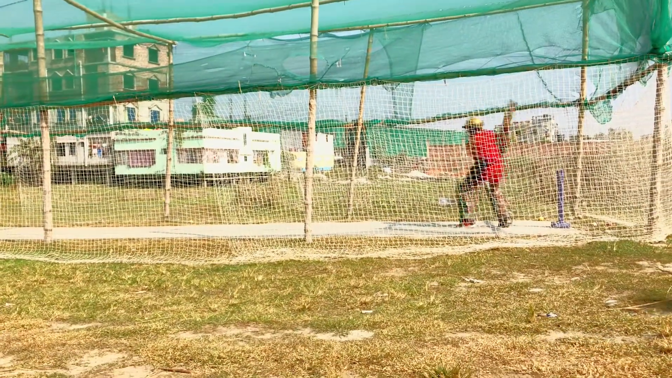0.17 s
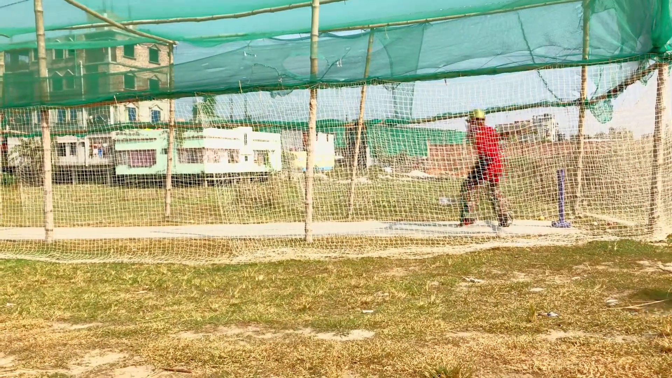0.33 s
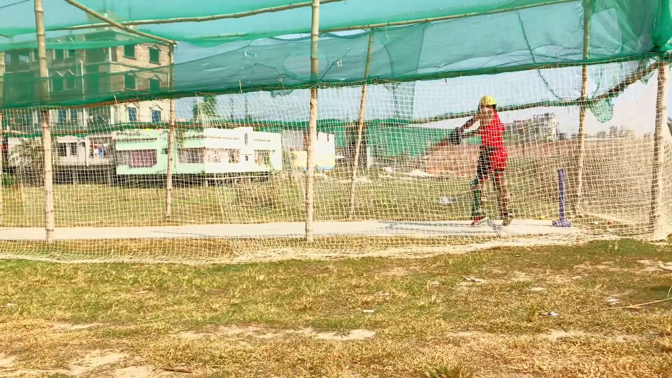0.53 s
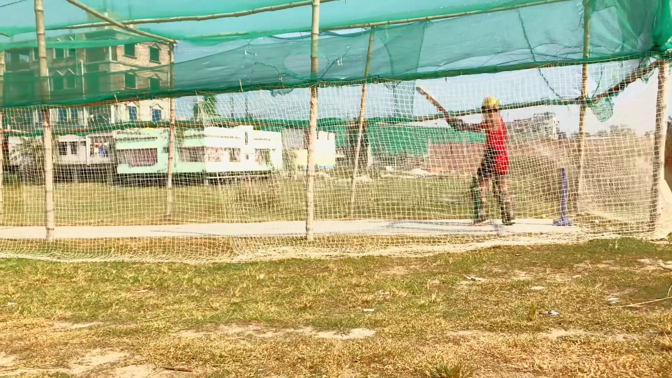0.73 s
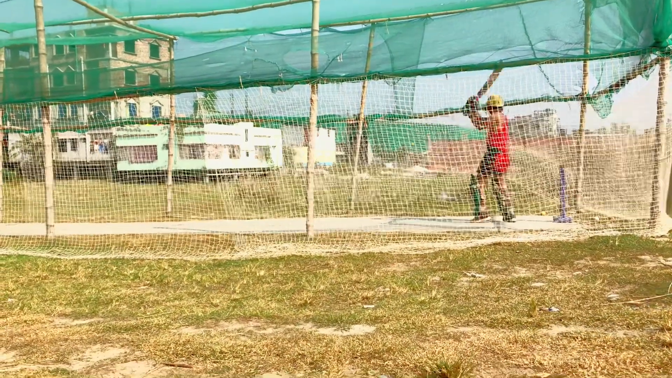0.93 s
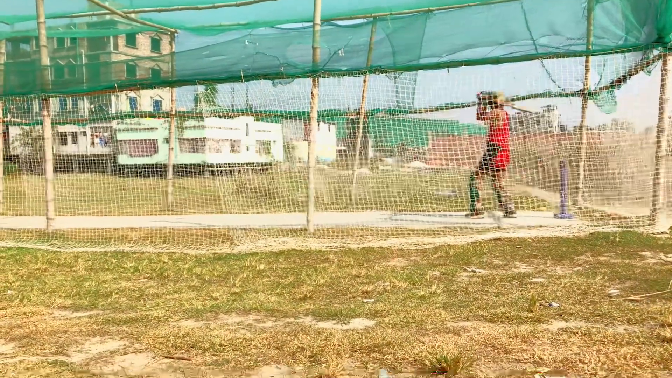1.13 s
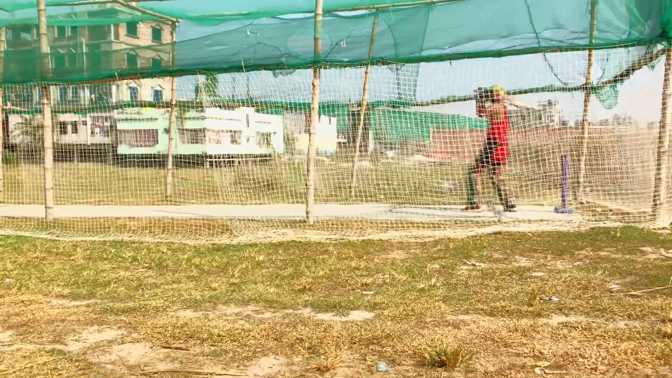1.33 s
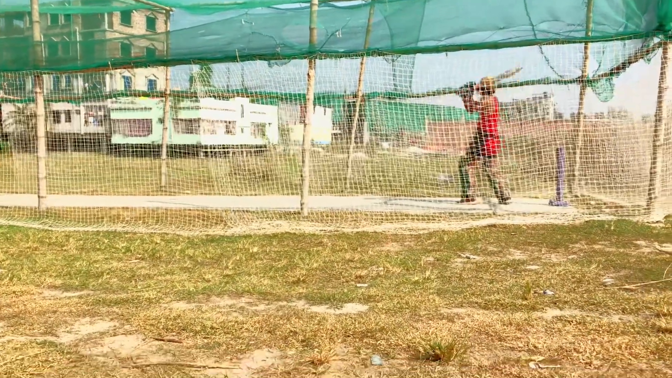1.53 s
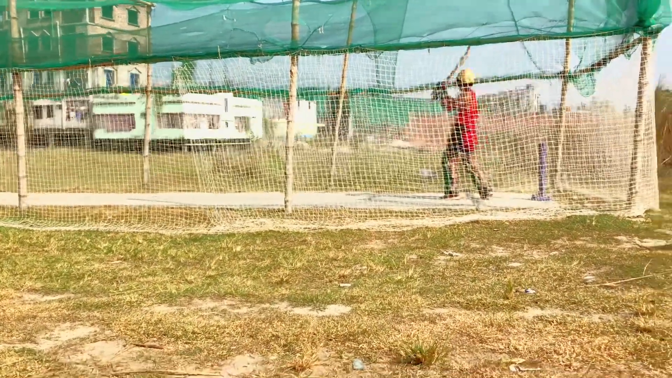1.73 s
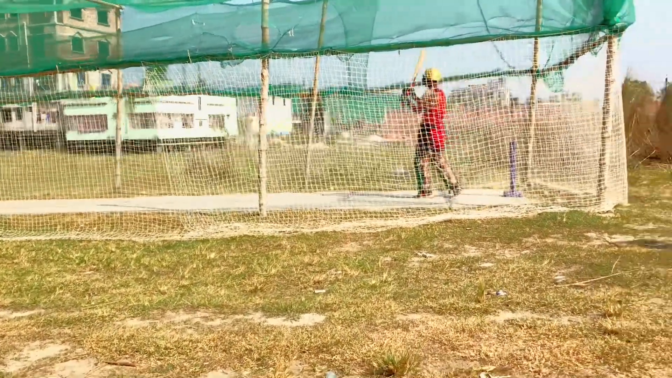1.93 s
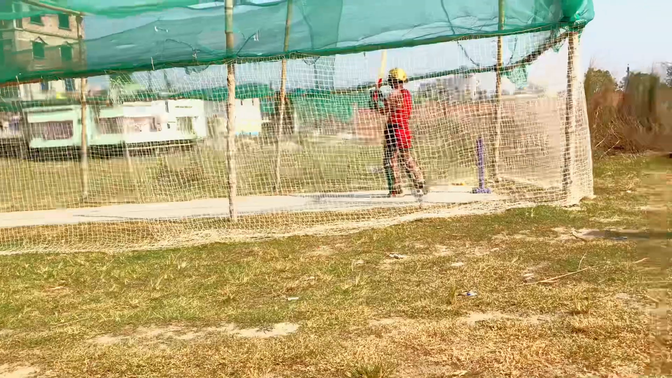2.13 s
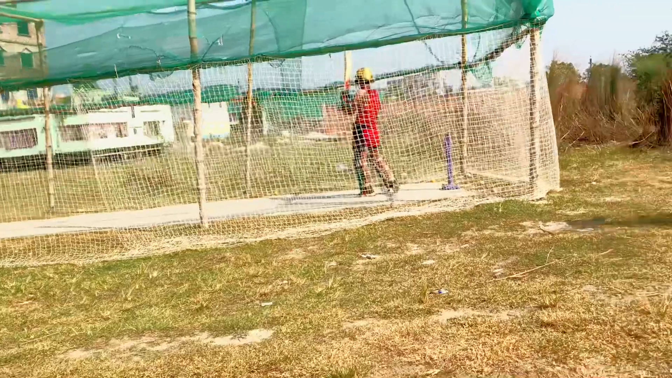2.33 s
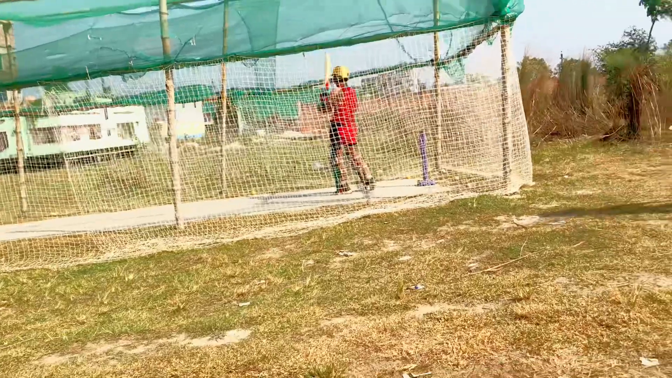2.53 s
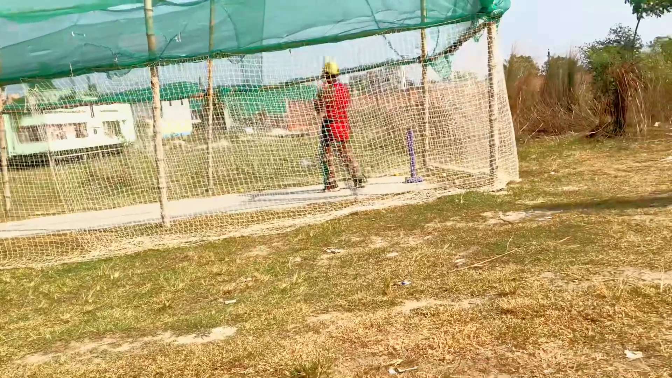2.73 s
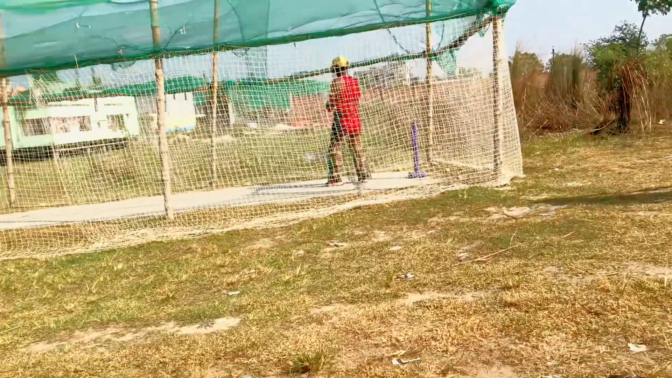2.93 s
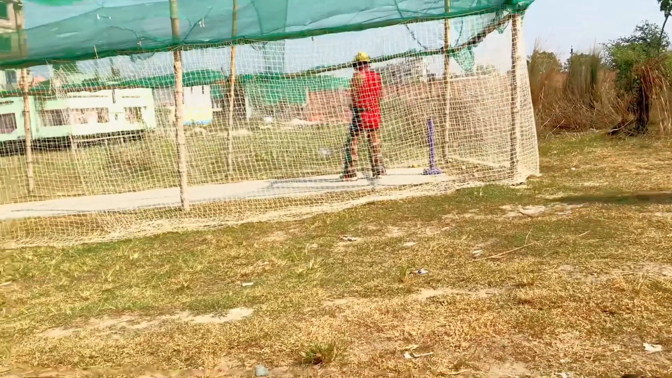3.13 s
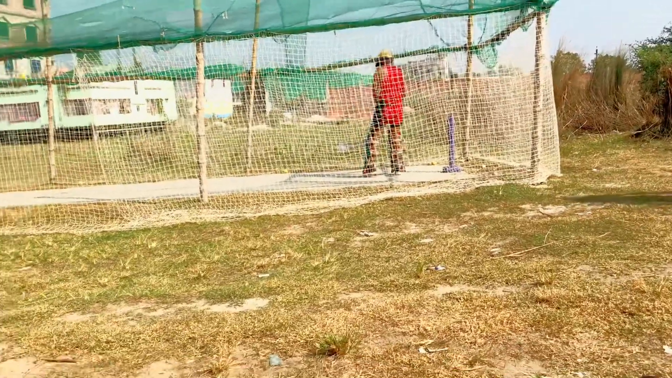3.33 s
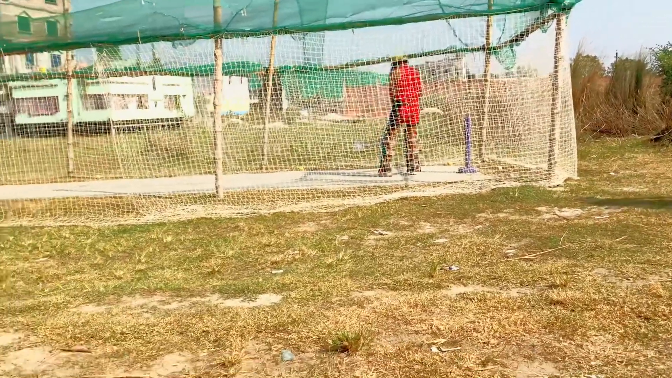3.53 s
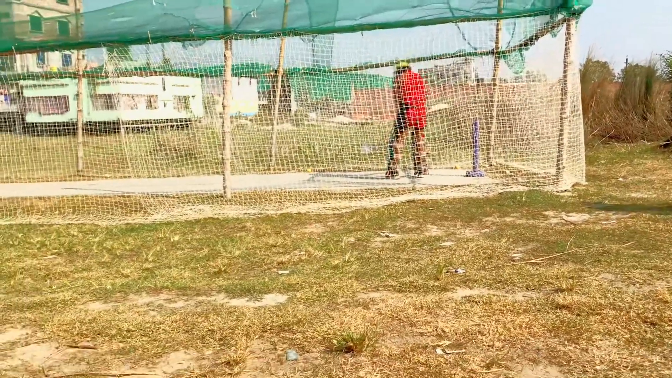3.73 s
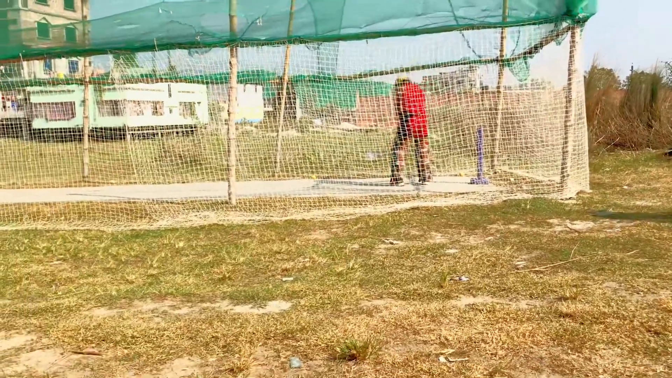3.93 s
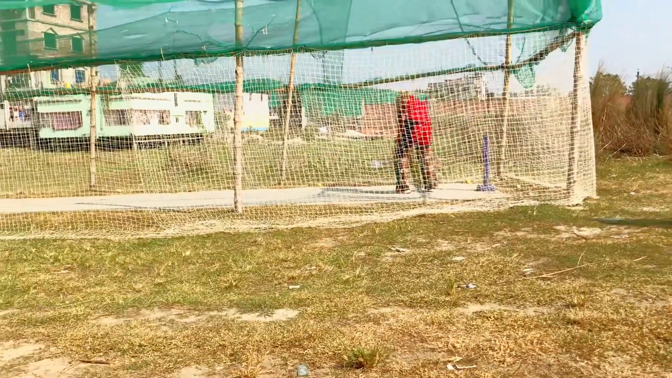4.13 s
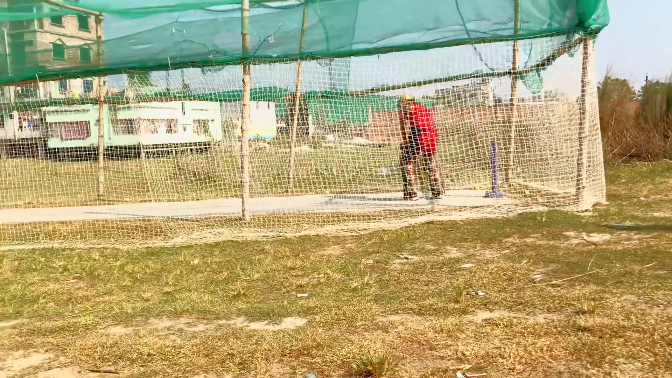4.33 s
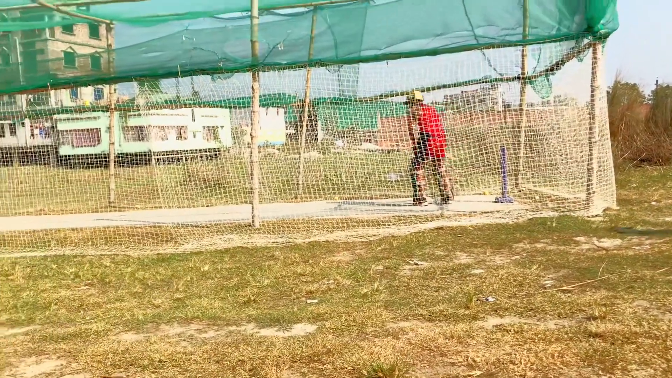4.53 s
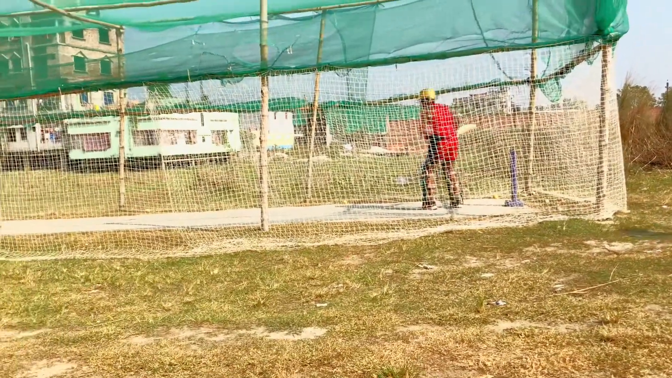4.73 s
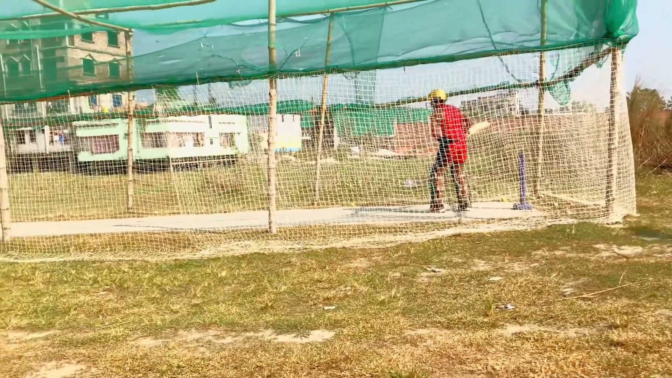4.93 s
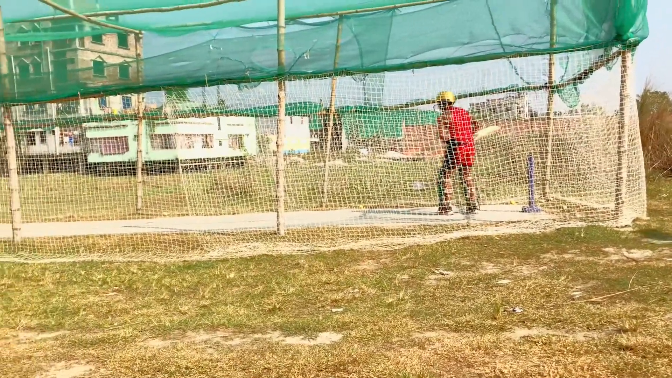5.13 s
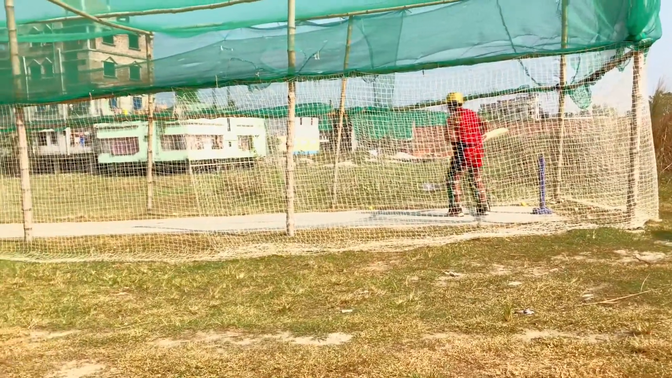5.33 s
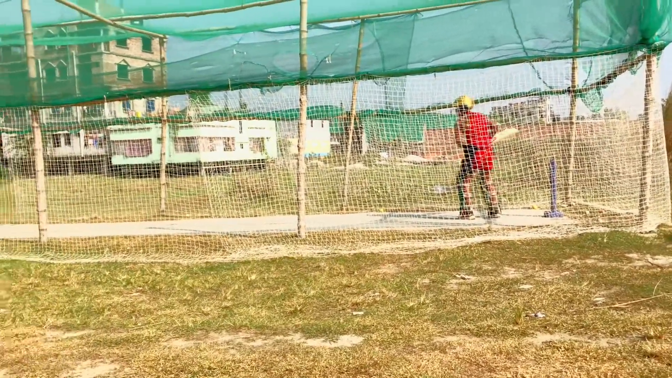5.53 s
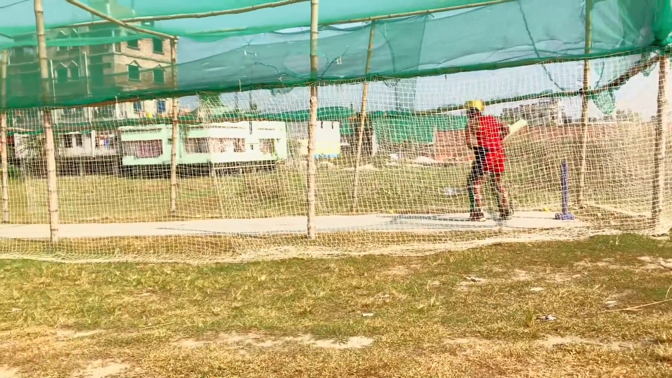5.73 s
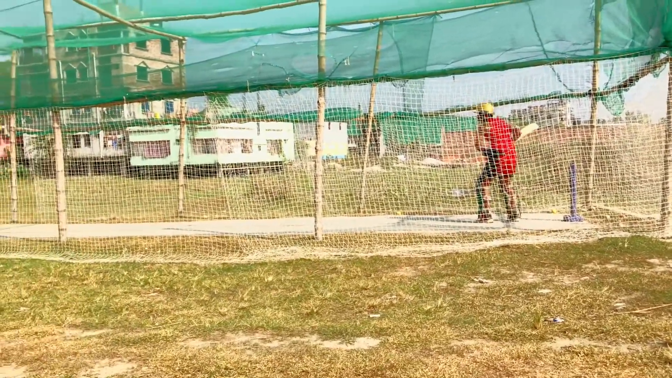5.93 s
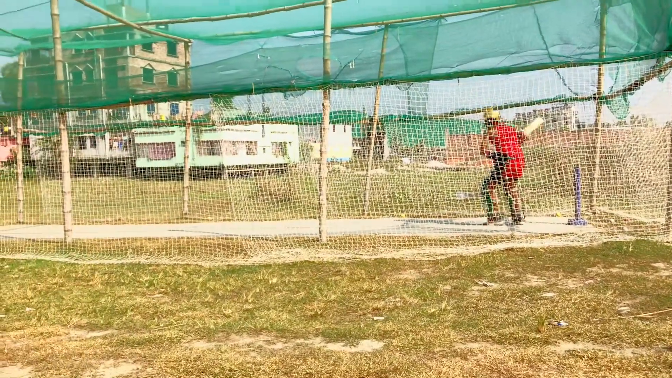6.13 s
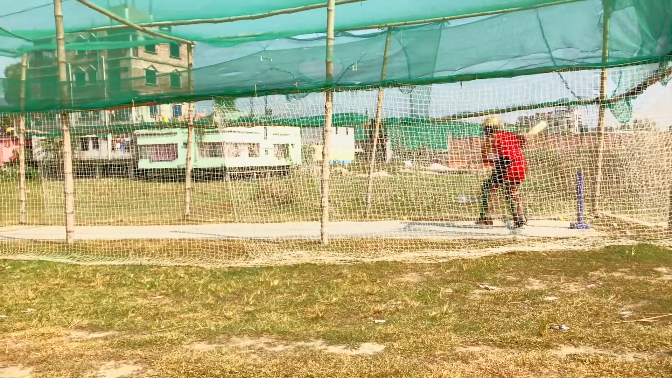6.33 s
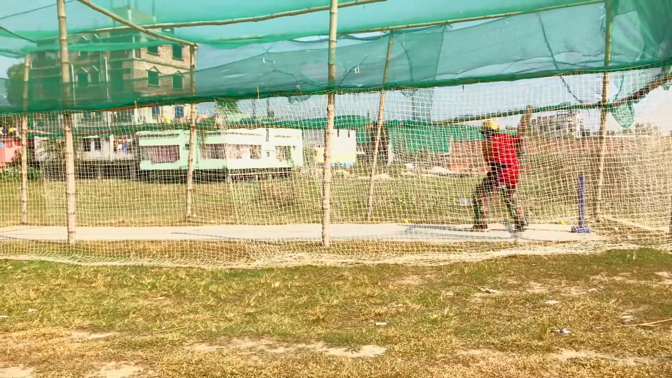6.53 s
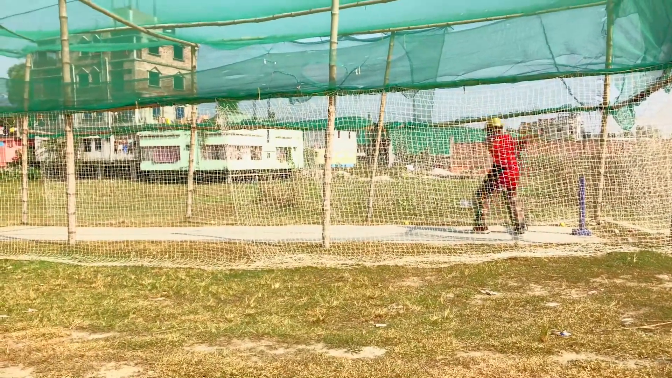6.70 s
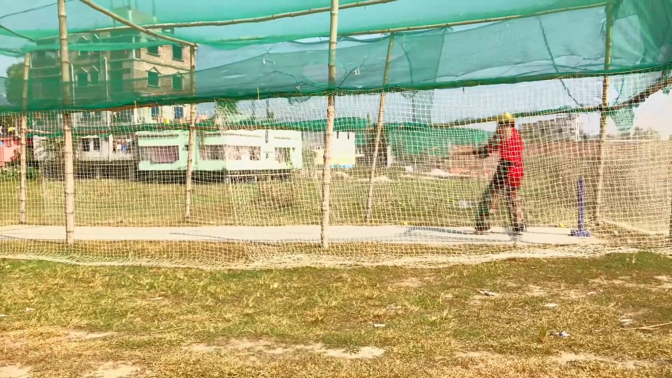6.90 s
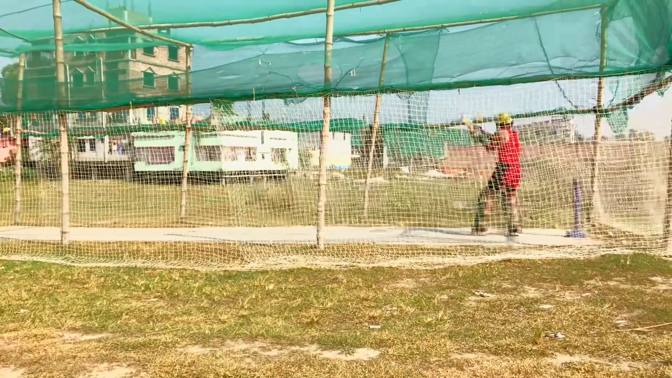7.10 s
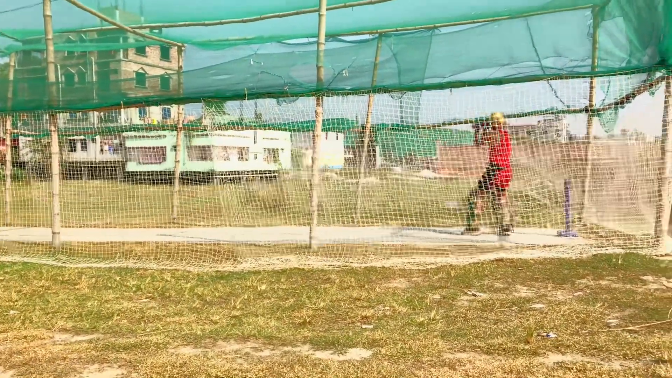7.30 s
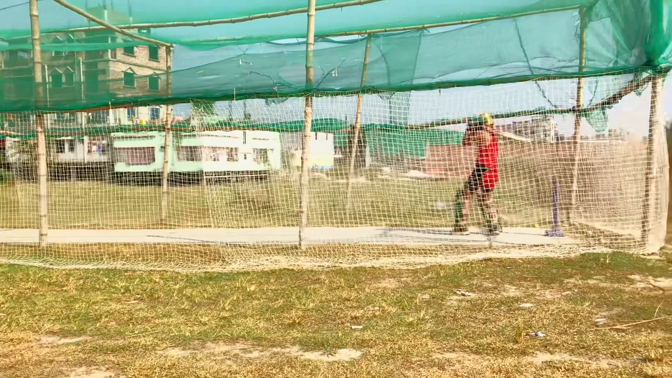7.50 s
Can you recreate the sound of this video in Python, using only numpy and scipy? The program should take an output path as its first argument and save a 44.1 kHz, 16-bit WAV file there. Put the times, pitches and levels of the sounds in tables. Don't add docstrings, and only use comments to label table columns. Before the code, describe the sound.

In an open-air cricket net, light grit taps lead to a brief starter grind and a violent bat crack. A single-cylinder engine catches close by, thumping low and revving in uneven bursts. Shoes squeak, balls bounce and something knocks hollowly; a loud bounce comes midway, then a brighter bat crack near the end. The small camera microphone hisses and overloads on the blows.

```python
import sys
import numpy as np
from scipy import signal
from scipy.io import wavfile
from scipy.ndimage import uniform_filter1d

SR = 44100
rng = np.random.default_rng(int(sys.argv[2]) if len(sys.argv) > 2 else 0)


def dump(signal):
    limited = np.clip(np.atleast_2d(signal).T, -1, 1)
    pcm = np.round(limited * 32767).astype(np.int16)
    wavfile.write(sys.argv[1], SR, pcm)


def gain_from_db(level_db):
    decades = np.asarray(level_db, float) / 20
    return 10 ** decades


N = 337790

# start_s, stop_s, rasp_db, bark_db, extra_rumble_db
THROTTLE = [
    (0.65, 0.92, -35.5, -32.5, 17.2),
    (2.107, 2.418, -39, -36, 4),
    (2.713, 2.946, -45.5, -54, 6),
    (3.777, 4.84, -40, -37.5, 1),
    (5.998, 6.823, -40, -42.5, 7.5),
    (7.108, 7.335, -52, -51, -0.8),
]


def rms_one(x):
    return x / np.sqrt(np.mean(x ** 2) + 1e-20)


def in_time(rows):
    s, *columns = np.transpose(rows)
    return [np.interp(np.arange(N) / SR, s, c) for c in columns]


def drift(rate):
    knots = rng.standard_normal(int(N / SR * 60) + 2)
    return np.interp(np.arange(N) / SR * min(rate, 59), np.arange(len(knots)), knots)


def resonate(x, hz, width_hz):
    r = np.exp(-np.pi * width_hz / SR)
    feedback = [1, -2 * r * np.cos(2 * np.pi * hz / SR), r * r]
    return signal.lfilter([(1 - r * r) / 2, 0, (r * r - 1) / 2], feedback, x)


def formants(x, table):
    total = 0
    for k, (hz, width_hz, db) in enumerate(table):
        total = total + (-1) ** k * gain_from_db(db) * resonate(x, hz, width_hz)
    return rms_one(total)


def band(x, low_hz, high_hz):
    return signal.sosfilt(signal.butter(2, [low_hz, min(high_hz, .45 * SR)], "band", fs=SR, output="sos"), x)


def top_cut(x, hz):
    return signal.sosfilt(signal.cheby2(14, 80, hz, fs=SR, output="sos"), x)


def add(out, s, sound):
    i = round(s * SR)
    out[i:i + len(sound)] += sound[:N - i]


def held(start, stop, db, rise_db_s, fall_db_s, swell_db_s=0):
    t = np.arange(N) / SR
    rise = rise_db_s * np.maximum(start - t, 0)
    swell = swell_db_s * np.clip(t - start, 0, stop - start)
    fall = fall_db_s * np.maximum(t - stop, 0)
    return gain_from_db(db - rise + swell - fall)


def air():
    # centre_hz, level_db per Hz
    air_spectrum = [(130, -3.5), (410, -22.5), (994, -25), (2600, -32), (4780, -37), (6870, -39.5),
                    (10500, -40), (14500, -45)]
    hz, db = np.transpose(air_spectrum)
    white = rng.standard_normal((2, N))
    edges = 155 * 2 ** np.arange(0, 7.1, .5)
    out = 0
    for k, (low, high) in enumerate(zip(edges, edges[1:])):
        level_db = np.interp(np.log(low * high) / 2, np.log(hz), db)
        out = out + gain_from_db(level_db + drift(11.0)) * band(white[k % 2], low, high)
    return gain_from_db(-43) * rms_one(out)


def whine():
    # multiple, level_db rms
    clock_lines = [(5, -76), (6, -71), (7, -70), (8, -70), (9, -70), (10, -72), (11, -73), (12, -76),
                   (13, -78), (14, -78), (15, -80)]
    clock_hz, t, out = 999.87, np.arange(N) / SR, 0
    for k, db in clock_lines:
        out = out + np.sqrt(2) * gain_from_db(db) * np.sin(2 * np.pi * (k * clock_hz * t + rng.random()))
    return out


def blow(modes, crack_db, crack_hz, tick_db, thud_db, thud_hz):
    t = np.arange(round(.06 * SR)) / SR
    contact = 1 - np.exp(-t / .0003)
    crack = sum(gain_from_db(db - 60 * t / t60) * np.sin(2 * np.pi * crack_hz * ratio * t) for ratio, db, t60 in modes)
    snap = band(rng.standard_normal(len(t)) * gain_from_db(-60 * t / .012), .55 * crack_hz, 2.5 * crack_hz)
    tick = band(rng.standard_normal(len(t)) * gain_from_db(-60 * t / .006), 4000, 16000)
    swell = thud_hz * t / .68
    thud = -swell ** 3 * np.exp(3 - 3 * swell) * np.sin(2 * np.pi * thud_hz * t)
    sharp = gain_from_db(crack_db) * contact * (crack + gain_from_db(-1.0) * snap) + gain_from_db(tick_db) * tick
    return sharp, gain_from_db(thud_db) * thud


def small_impacts():
    # ratio, level_db, t60_s
    contact_modes = [(1, 0, .006), (1.45, -4, .005), (1.9, -7, .004), (.55, -5, .006)]
    # start_s, crack_db, crack_hz, tick_db
    taps = [
        (.048, -31, 4040, -39),
        (.092, -29, 3500, -34),
        (.108, -30, 3320, -40),
            (5.405, -58, 4000, -43),
        (5.465, -58, 4000, -44),
    ]
    # start_s, crack_db, crack_hz, thud_db, thud_hz
    knocks = [
        (.0695, -28, 800, -46, 503),
        (.1147, -22.5, 2850, -24, 625),
        (1.312, -33, 900, -28, 300),
        (1.4738, -24.5, 1040, -46, 400),
        (1.489, -30, 1300, -29, 395),
        (1.496, -22.5, 850, -44, 420),
        (4.188, -10.5, 1320, -9.5, 360),
        (6.5402, -21.5, 6200, -23, 307),
    ]
    out = np.zeros(N)
    for s, *strength in taps:
        add(out, s, blow(contact_modes, *strength, 0, strength[1])[0])
    for s, db, hz, thud_db, thud_hz in knocks:
        tick_db = db + min(19 * np.log2(hz / 2690), -8)
        add(out, s, sum(blow(contact_modes, db, hz, tick_db, thud_db, thud_hz)))
    return out


def silencer(x):
    # centre_hz, width_hz
    chambers = [(91, 36), (63, 32)]
    for hz, width_hz in chambers:
        x = resonate(x, hz, width_hz)
    return band(x, 37, 138)


def loose_burns(running, per_s):
    # level_db, rise_db_s, fall_db_s
    cranked = (-36, 130, 540)
    lit_db = -25 - .65 * (per_s - 10)
    for start, stop, _, _, rumble_db in THROTTLE:
        lit_db = lit_db + rumble_db * held(start, stop, 0, 60, 67)
    unlit = held(.07, .2, *cranked) + gain_from_db(-36)
    gain = np.where(running, gain_from_db(lit_db), unlit)
    return uniform_filter1d(gain, size=2000) * rms_one(silencer(rng.standard_normal(N)))


def starter():
    # centre_hz, width_hz, level_db
    gear_rings = [(1050, 110, 0), (1500, 300, -3), (2150, 170, -7), (3150, 130, -2), (3980, 110, -9),
                  (5670, 120, -15)]
    # start_s, stop_s, level_db
    grinds = [
        (.295, 0.359, -43),
        (0.439, 0.458, -28),
    ]
    # time_s, pitch_hz, level_db
    swish = [(.415, 3250, -58), (.428, 3180, -43), (.44, 3020, -42), (.452, 2800, -50)]
    pushes = sum(held(*row, rise_db_s=420, fall_db_s=1200) for row in grinds)
    grind = pushes * gain_from_db(-1.5 + 2.5 * drift(45)) * formants(rng.standard_normal(N), gear_rings)
    t = np.arange(N) / SR
    pitch_hz, db = in_time(swish)
    edge = np.clip(np.minimum(t - swish[0][0], swish[-1][0] - t) / .006, 0, 1)
    whistle = np.sqrt(2) * gain_from_db(db) * edge * np.sin(2 * np.pi * np.cumsum(pitch_hz) / SR)
    return grind + whistle


def bat_blows():
    # start_s, crack_db, crack_hz, tick_db, thud_db
    hits = [
        (0.454, 4, 1307, -12, -4.5),
        (6.8214, 1, 1584, -5, -5.5),
    ]
    # ratio, level_db, t60_s
    blade = [
        [(1, 2, 0.01), (1.52, -13.5, 0.018), (2.4, -5.5, 0.0055), (2.75, -36, .005), (3.4, 1, 0.0031)],
        [(1, 7, 0.0036), (.34, -10.5, 0.025), (.7, -18, 0.0046), (1.3, -16, .006), (1.92, -0.5, 0.0067),
         (2.15, -7, 0.0063), (2.75, -5.5, 0.0054)],
    ]
    # delay_s, level_db, smear_s
    echoes = [(.0075, -19, .002), (.0115, -15, .002), (.0165, -23, .002), (.024, -22, .001),
              (.032, -28, .002), (.0385, -22, .002), (.052, -31, .003)]
    # centre_hz, level_db, t60_s
    scatter = [(300, -24, 0.099), (1300, -21.5, 0.038), (3170, -27, 0.063), (6400, -36.5, 0.33),
               (12000, -47.5, 0.31)]
    out, t = np.zeros(N), np.arange(round(.4 * SR)) / SR
    for (s, *strength), modes in zip(hits, blade):
        sharp, thud = blow(modes, *strength, thud_hz=.228 * strength[1])
        add(out, s, sharp)
        add(out, s + .0008, thud)
        for lag, db, smear in echoes:
            rough = rng.standard_normal(300) * np.exp(-t[:300] / smear * 2)
            add(out, s + lag, gain_from_db(db) * np.convolve(sharp, rough / np.linalg.norm(rough)))
        for hz, db, t60 in scatter:
            tail = rms_one(band(rng.standard_normal(len(t)), hz / 2.04, hz * 1.72))
            add(out, s + 0.0017, tail * gain_from_db(db - 60 * t / t60))
    return out


def crankshaft():
    # time_s, firings_per_s
    speed = [(.506, 14.5), (.63, 20.0), (.81, 37.75), (1.173, 23.798), (1.541, 14.626), (1.818, 10.267),
             (2.235, 27.146), (2.603, 15.415), (2.865, 21.091), (3.288, 10.26), (3.568, 10.658),
             (3.855, 27.21), (4.782, 29.954), (5.366, 14.679), (5.777, 11.805), (5.845, 24.903),
             (6.84, 25.172), (7.387, 9.648)]
    lead_s = .0115
    per_s = in_time(speed)[0]
    running = np.arange(N) >= (speed[0][0] - lead_s) * SR
    turns = np.cumsum(np.roll(per_s, -round(lead_s * SR)) * running) / SR
    return running, per_s, turns


def exhaust_thump(fired):
    # time_s, peak_db
    burn = [(.57, -9.5), (.68, -11.5), (.8, -12), (.85, -5), (1.25, -5.5), (1.7, -13.5), (1.95, -11),
            (2.2, -21), (2.9, -7.5), (3.3, -19), (3.6, -12.5), (4.6, -18), (4.87, -28), (4.97, -6.5),
            (5.4, -18), (6.9, -28.5), (7.05, -10), (7.2, -55), (7.4, -15), (7.66, -25)]
    peak = np.abs(silencer(np.r_[1, np.zeros(4000)])).max()
    return gain_from_db(-3.0) * silencer(fired * gain_from_db(in_time(burn)[0]) + 1e-18) / peak


def throttle(levels_db, fall_db_s, idle_db):
    gain = gain_from_db(idle_db)
    for row, db in zip(THROTTLE, levels_db):
        gain = gain + held(row[0], row[1], db, rise_db_s=66, fall_db_s=fall_db_s, swell_db_s=2.5)
    return gain


def drone(turns):
    # order, level_db, lag_turns
    orders = [(2, -2.5, 0.36), (4, -4, 0.84), (6, -18.5, 0.29), (9, -16, .8)]
    hum = sum(gain_from_db(db) * np.sin(2 * np.pi * (round(k) * turns - lag)) for k, db, lag in orders)
    return band(hum, 45, 500)


def exhaust_bark(pulses, turns, running):
    # centre_hz, width_hz, level_db
    pipe = [(60, 26, 13), (174, 26, 5), (263, 24, -5), (340, 60, -15)]
    ring = formants(pulses + .12 * rng.standard_normal(N), pipe)
    ring = rms_one(band(ring, 35, 420))
    bark_db = np.transpose(THROTTLE)[3]
    gain = running * throttle(bark_db, fall_db_s=65, idle_db=-46.5)
    return gain_from_db(5.5) * gain * (ring + drone(turns))


def gear_mesh(turns, per_s):
    teeth = 38.5
    mesh = drift(59) * np.sin(2 * np.pi * teeth * turns + 1.2 * drift(30))
    coasting = uniform_filter1d(np.where(np.gradient(per_s) * SR < -10, 1, .15), 4000)
    return mesh * coasting * np.clip((28 - per_s) / 3, .15, 1)


def rasp(pulses, turns):
    # centre_hz, width_hz, level_db
    gas_rings = [(480, 160, -5), (695, 55, 3), (900, 220, -6), (1095, 28, 5), (1400, 350, -9),
                 (1900, 170, -5), (2430, 150, -10)]
    puff = np.exp(-5.0 * (turns % 1))
    gas = rng.standard_normal(N) * (1 + 0.24 * puff) * gain_from_db(2.0 * drift(25))
    return formants(gas + .35 * pulses, gas_rings)


def valve_clatter(turns):
    # centre_hz, width_hz, level_db
    valve_rings = [(3210, 150, -4), (3720, 220, 0), (4450, 220, -3), (4800, 150, -7), (5700, 1400, -13)]
    valves = np.exp(-7.0 * ((turns + .4) % 1)) + .5 * np.exp(-7.0 * ((turns + .8) % 1))
    return formants(rng.standard_normal(N) * (1 + 2.0 * valves) * gain_from_db(1.3 * drift(40)), valve_rings)


def engine():
    # start_s, stop_s, level_db, rise_db_s, fall_db_s
    linger = (5.0, 5.45, -52, 60, 30)
    running, per_s, turns = crankshaft()
    strength = gain_from_db(.9 * rng.standard_normal(400)[turns.astype(int)])
    fired = np.diff(np.ceil(turns), prepend=0) * strength
    pulses = rms_one(fired / np.sqrt(per_s))
    low = exhaust_thump(fired) + loose_burns(running, per_s) + exhaust_bark(pulses, turns, running)

    opened_s, _, rasp_db, _, _ = np.transpose(THROTTLE)
    clatter_db = rasp_db - 16.5 + 2.22 * opened_s
    rasp_gain = throttle(rasp_db, fall_db_s=54.5, idle_db=-76.5)
    clatter_gain = throttle(clatter_db, fall_db_s=80, idle_db=-61) + held(*linger)
    body = rasp_gain * (rasp(pulses, turns) + gear_mesh(turns, per_s))
    body = body + clatter_gain * valve_clatter(turns)
    return low + gain_from_db(-4.5) * body


def shoes():
    # start_s, stop_s, pitch_hz, level_db, neighbour_db
    slips = [
        (0.68, 0.68, 1115, -23, -18),
        (0.702, 0.727, 1128, -23, -19),
        (7.052, 7.066, 1174, -34, -20),
        (7.071, 7.095, 1138, -24.5, -14),
    ]
    edge_db_s = 1100
    out, t = 0, np.arange(N) / SR
    for start, stop, hz, db, beside_db in slips:
        bend = 110000 * np.clip(t - (start + stop) / 2, -.03, .03) ** 2
        phase = 2 * np.pi * np.cumsum(hz + bend) / SR
        octave = held(start, start + 0.006, -20, edge_db_s, fall_db_s=500)
        tone = np.sin(phase) + octave * np.sin(2 * phase) + gain_from_db(beside_db) * np.sin(.89 * phase)
        out = out + np.sqrt(2) * held(start, stop, db, edge_db_s, edge_db_s) * gain_from_db(drift(46)) * tone
    return out


def bump():
    # start_s, level_db, pitch_hz, t60_s
    foot_thump = (1.4775, -12, 168, .1)
    s, db, hz, t60 = foot_thump
    out, t = np.zeros(N), np.arange(round(.1 * SR)) / SR
    add(out, s, -gain_from_db(db - 60 * t / t60) * (1 - np.exp(-t / 0.0022)) * np.sin(2 * np.pi * hz * t))
    return out


def rustle():
    # level_db, rise_db_s, fall_db_s
    cloth = (-42.5, 500, 54)
    grains = rng.standard_normal(N) * gain_from_db(1.9 * drift(50))
    hiss = rms_one(band(grains, 1600, 14000) + .5 * band(grains, 4900, 6900))
    return held(3.385, 3.43, *cloth) * hiss


def scene():
    hiss = top_cut(air() + rustle(), 16250)
    impacts = small_impacts() + bat_blows() + bump()
    return (hiss + whine() + impacts + starter() + engine() + shoes())[None]


def band_limit(x):
    return signal.sosfilt(signal.butter(12, 16560, fs=SR, output="sos"), x)


def record(dry):
    overloaded = np.clip(dry, -.97, .97)
    return band_limit(top_cut(overloaded, 16600))


dry = scene()
out = record(dry)
dump(out)
```